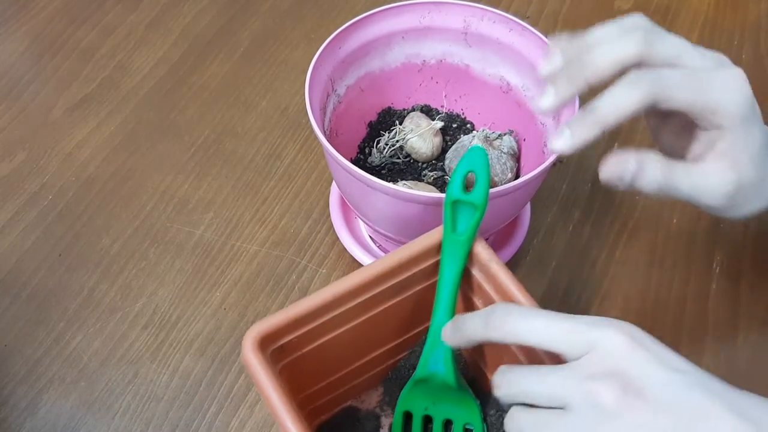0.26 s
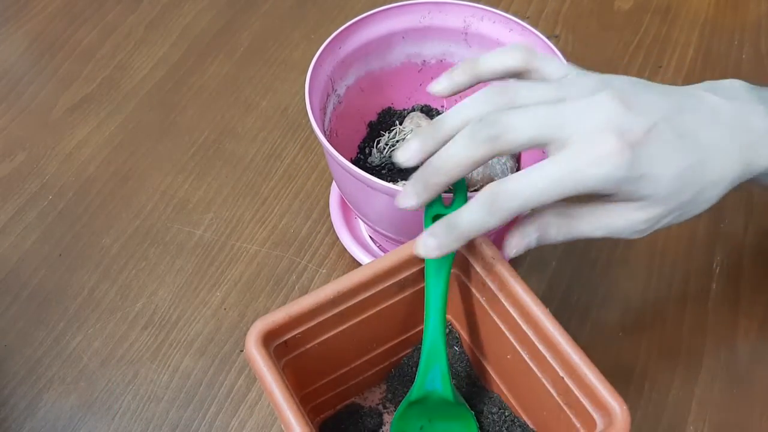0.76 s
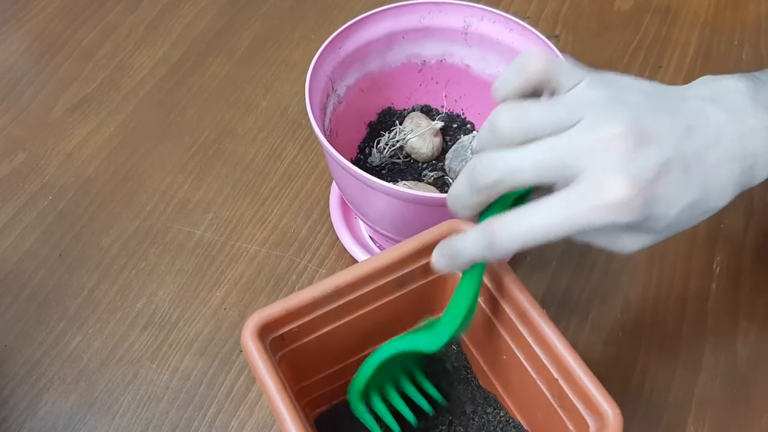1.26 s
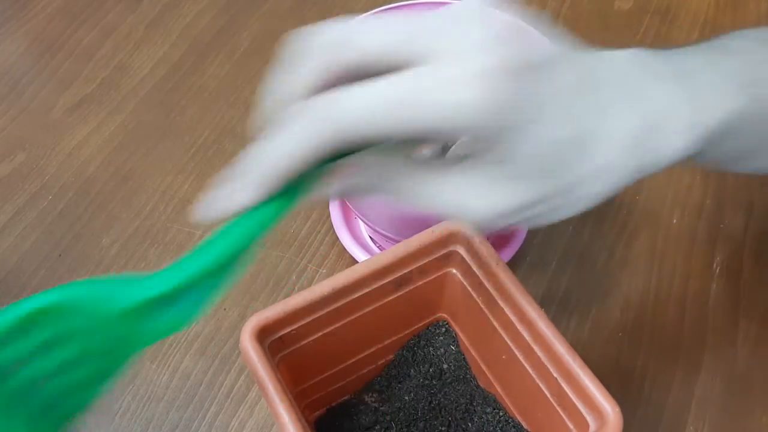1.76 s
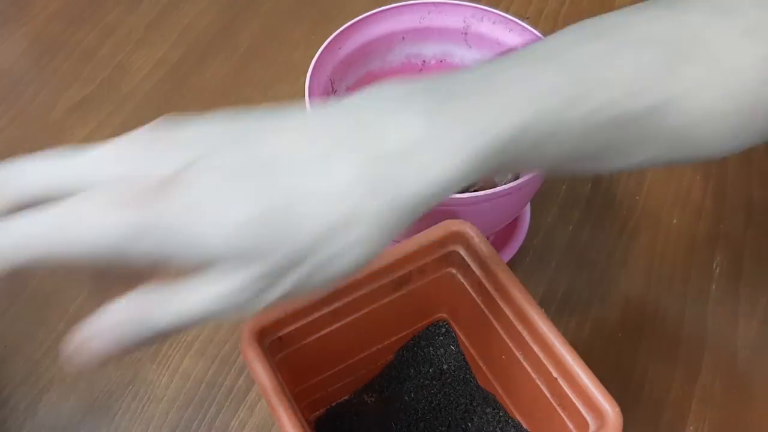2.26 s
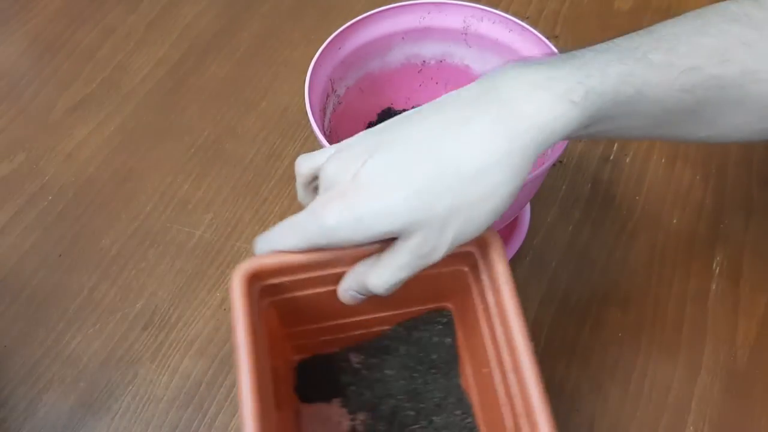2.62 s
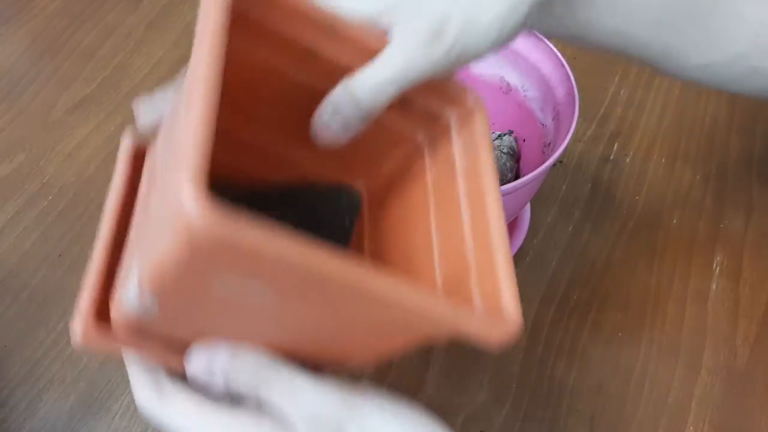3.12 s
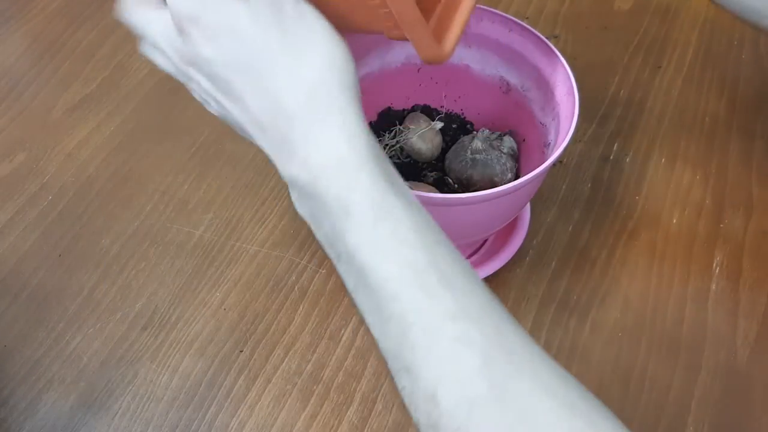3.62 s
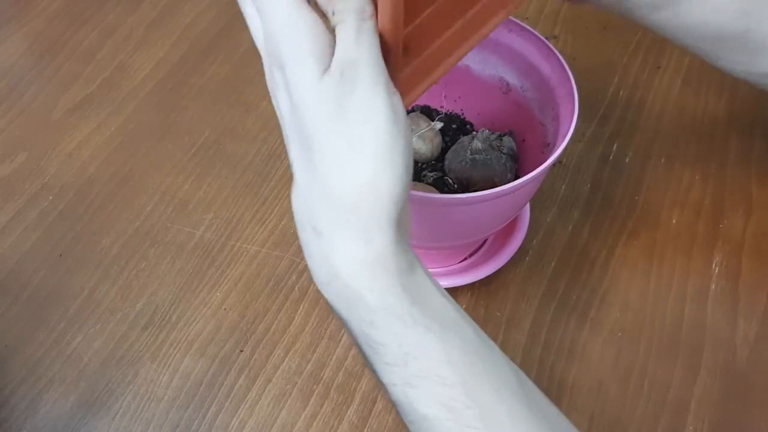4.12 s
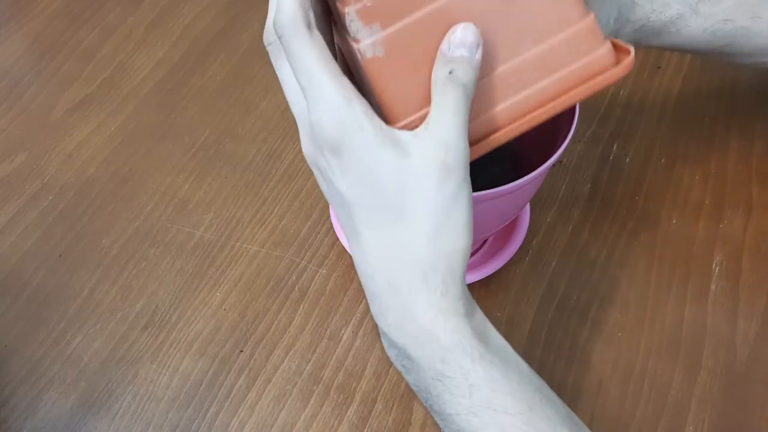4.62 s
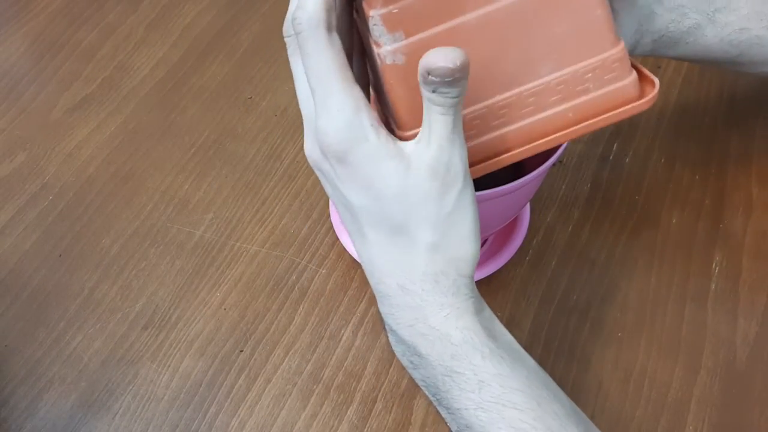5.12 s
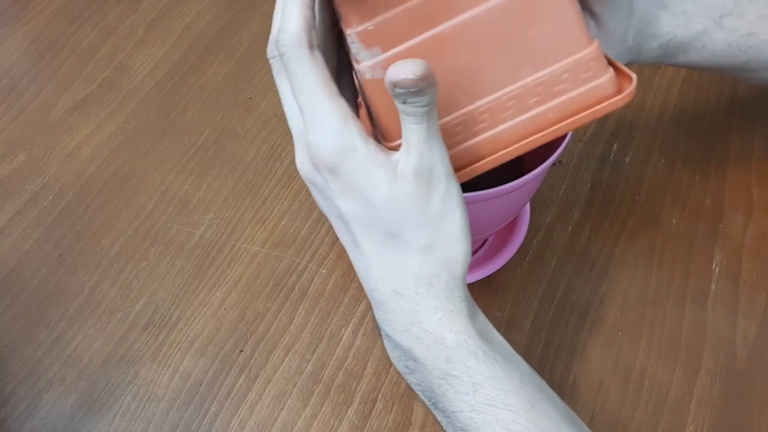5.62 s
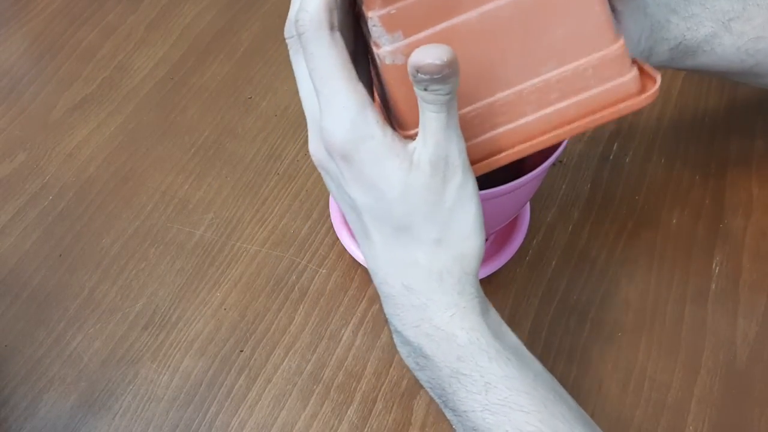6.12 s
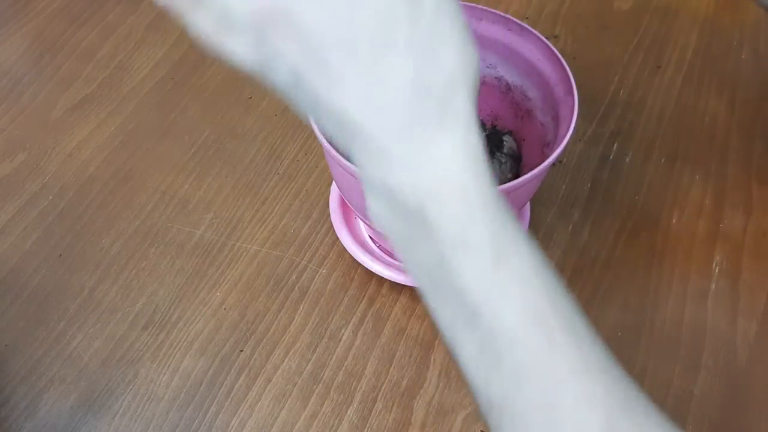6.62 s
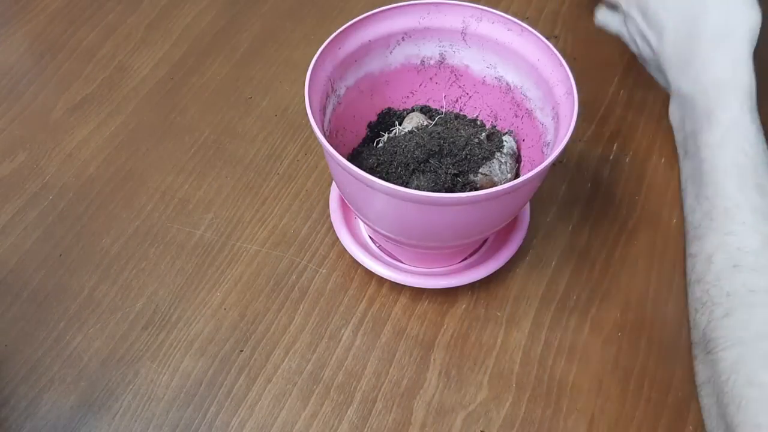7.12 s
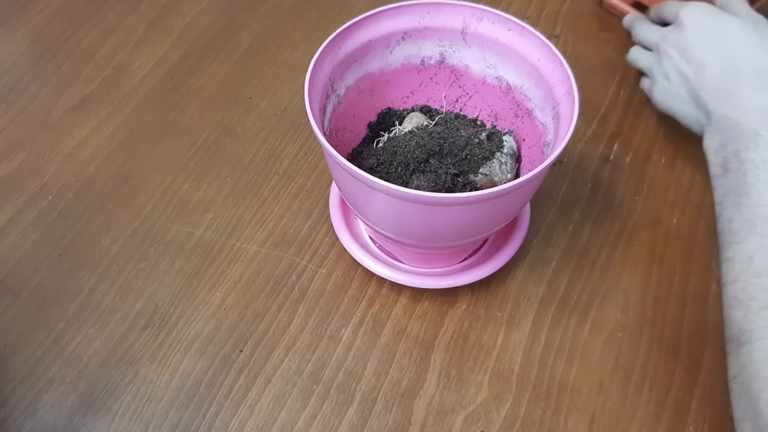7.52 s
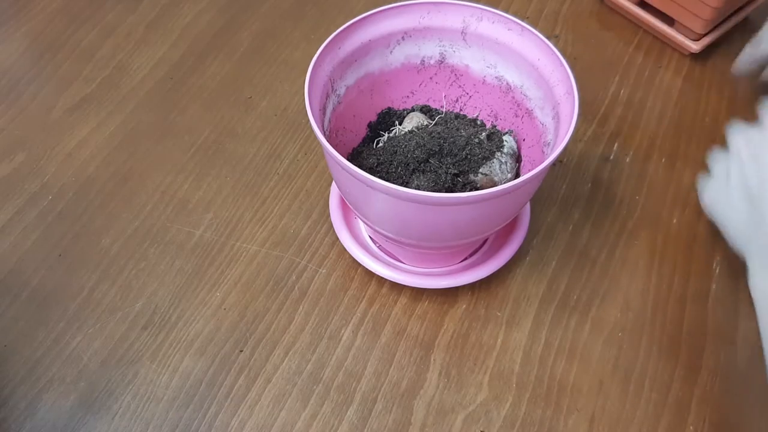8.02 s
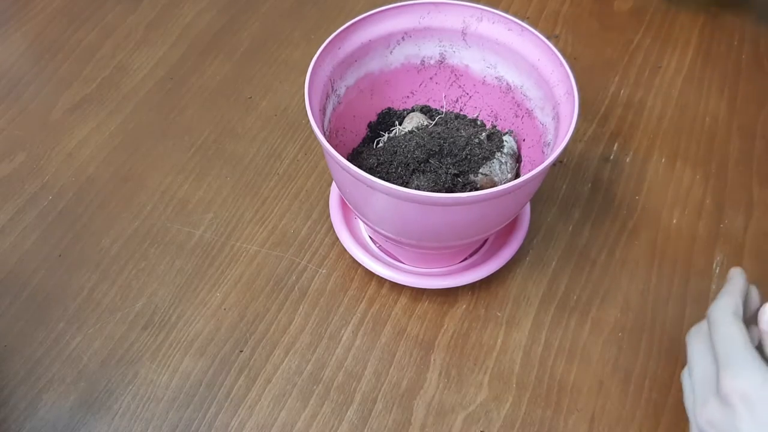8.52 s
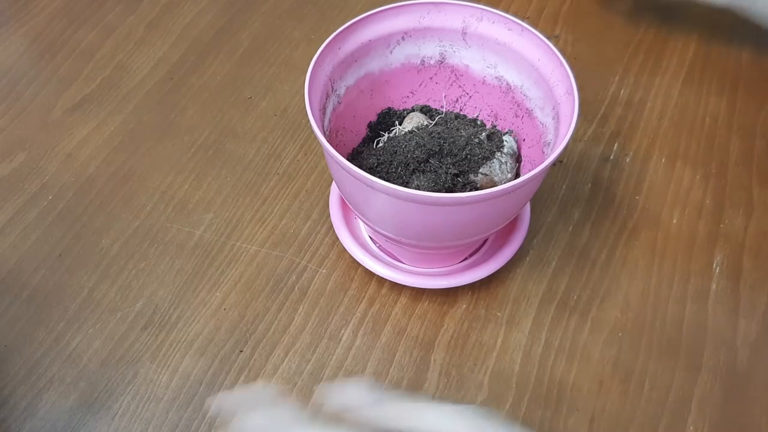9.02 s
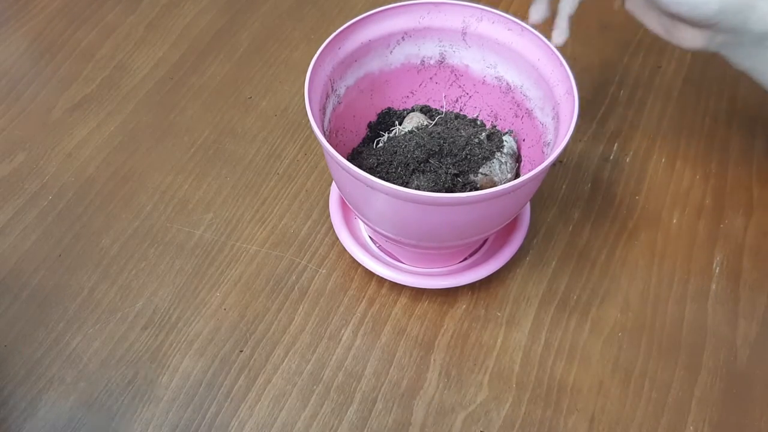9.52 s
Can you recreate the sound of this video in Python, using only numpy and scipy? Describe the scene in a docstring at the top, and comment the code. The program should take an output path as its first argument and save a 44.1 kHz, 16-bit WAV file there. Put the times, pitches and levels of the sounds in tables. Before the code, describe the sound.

Hollow plastic planter slides and knocks on a wooden table, a trowel clacks down, soil trickles softly into a pot, then more plastic knocks and scraping.

```python
"""Tipping soil into a flower pot

Soil is tipped from a plastic planter into a pot on a wooden table in a small room. A planter is slid up,
a plastic trowel is laid down, hands rub, brush and knock the thin walls, and planters are pushed and slid.
Knocks and clods are noisy touches plus ringing modes; sliding, rubbing, running soil and brushing hands
are filtered streams of tiny random contacts. Echoes and a low room tone surround them.
"""
import sys
import numpy as np
from scipy import signal
from scipy.fft import rfft, irfft, next_fast_len
from scipy.io import wavfile
from scipy.ndimage import uniform_filter1d, map_coordinates

SR = 44100
rng = np.random.default_rng(int(sys.argv[2]) if len(sys.argv) > 2 else 0)


def bounce(signal):
    """Save signal as a 16-bit WAV file at the path given by the first command-line argument."""
    frames = np.transpose(np.atleast_2d(signal))
    limited = np.clip(frames, -1, 1)
    pcm = np.round(limited * 32767).astype(np.int16)
    wavfile.write(sys.argv[1], SR, pcm)


N = 430416


def from_db(db):
    """Turn decibels into a gain."""
    return 10 ** (np.asarray(db) / 20)


def rms_one(x):
    """Scale to rms 1."""
    return x / np.sqrt(np.mean(x ** 2) + 1e-20)


def unit(x):
    """Scale to energy 1."""
    return x / np.linalg.norm(x)


def add(track, s, sound):
    """Mix a sound in at a time in seconds; a part before the start is cut off."""
    start = int(s * SR)
    sound, start = sound[max(-start, 0):], max(start, 0)
    track[start:start + len(sound)] += sound[:N - start]


def at_hz(points, hz, axis=1):
    """Read a column of a table on a log-frequency axis."""
    table = np.array(points)
    return np.interp(np.log(np.maximum(hz, 1)), np.log(table[:, 0]), table[:, axis])


def in_time(rows, axis=1):
    """Read a column at every sample, with straight lines between the rows."""
    table = np.array(rows)
    return np.interp(np.arange(N) / SR, table[:, 0], table[:, axis])


def held(rows, axis):
    """Keep each row's value until the next row starts, with smoothed steps."""
    table = np.array(rows)
    current = np.maximum(np.searchsorted(table[:, 0], np.arange(N) / SR) - 1, 0)
    return uniform_filter1d(table[current, axis], size=2000)


def swell(rise_s, hold_s, fall_s):
    """Envelope of one movement: it speeds up, holds and slows down smoothly."""
    corners = np.cumsum(np.maximum([0, rise_s, hold_s, fall_s], 0))
    ramp = np.interp(np.arange(int(corners[-1] * SR)) / SR, corners, [0, 1, 1, 0])
    return np.sin(np.pi / 2 * ramp) ** 2


def strokes(rows, rise, fall, axis=2):
    """Gain of separate strokes of one shape, each with its own length and level."""
    gain = np.zeros(N)
    for row in rows:
        s, length = row[:2]
        shape = swell(rise * length, (1 - rise - fall) * length, fall * length)
        add(gain, s, from_db(row[axis]) * shape)
    return gain


def drift(rate):
    """Slow random wander: normal random points, rate per second, joined by straight lines."""
    knots = rng.standard_normal(int(N / SR * rate) + 2)
    return np.interp(np.arange(N) / SR * rate, np.arange(len(knots)), knots)


def dying(t, t60):
    """Decay by 60 dB in t60 seconds."""
    return np.exp(-np.log(1000) * t / t60)


def band(x, low, high):
    """Keep only the sound between two frequencies."""
    return signal.sosfilt(signal.butter(3, [low, high], "band", fs=SR, output="sos"), x)


def colour(x, spectrum):
    """Filter to a spectrum, falling 20 dB per octave beyond its ends, without sounding early."""
    size = next_fast_len(x.shape[-1] + 4096, True)
    hz = np.maximum(np.fft.rfftfreq(size, 1 / SR), 1)
    octaves_outside = np.abs(np.log2(hz / np.clip(hz, spectrum[0][0], spectrum[-1][0])))
    gain = from_db(at_hz(spectrum, hz) - 20 * octaves_outside)
    # folding the cepstrum onto positive times makes the filter minimum-phase
    cepstrum = irfft(np.log(gain), size)
    cepstrum[1:size // 2] *= 2
    cepstrum[size // 2 + 1:] = 0
    return irfft(rfft(x, size) * np.exp(rfft(cepstrum)), size)[..., :x.shape[-1]]


def resonance(x, hz, q):
    """A resonance that glides: a row of band-passes, each faded in as the pitch comes near."""
    out = 0
    for centre in np.geomspace(500, 2800, 16):
        near = np.maximum(1 - np.abs(np.log2(hz / centre)) * 6, 0)
        out = out + near * rms_one(signal.lfilter(*signal.iirpeak(centre, q, fs=SR), x))
    return rms_one(out)


def grains(per_s, spread_db):
    """Random tiny contacts, a few much stronger than the rest."""
    sizes = from_db(spread_db * np.minimum(rng.exponential(1, N), 5)) * rng.choice([-1, 1], N)
    return rms_one(sizes * (rng.random(N) < per_s / SR))


def ringing(modes, t, spread_db, detune):
    """Modes struck at a random spot; the grip shifts their pitch a little."""
    hz, db, t60 = np.array(modes).T[:, :, None]
    strength, shift, sign = rng.standard_normal((3, len(modes), 1))
    gain = np.sign(sign) * from_db(db + spread_db * strength)
    tones = np.sin(2 * np.pi * hz * (1 + detune * shift) * t)
    return np.sum(gain * tones * dying(t, t60), axis=0)


def pair(mid, side, alike):
    """Left and right with a given correlation."""
    return np.sqrt((1 + alike) / 2) * mid + np.sqrt((1 - alike) / 2) * side * np.array([[1], [-1]])


# How alike left and right are. Each row: frequency in Hz, correlation (1 is identical).
LIKENESS = [(50, 0.99), (200, 0.89), (500, 0.9), (1200, 0.032), (10000, 0.07)]
# Colour of the room tone. Each row: frequency in Hz, density in dB per Hz before the loudness is set.
ROOM_TONE = [(20, -39), (32, -34), (50, -10.5), (75, -18), (120, -9), (150, -10), (210, -6.5), (360, -24.5),
             (540, -20.5), (1150, -40.5), (1800, -35), (3100, -49.5), (9000, -55), (16000, -39)]


def room_tone():
    """Low, steady murmur of the building: filtered noise that is most alike on both sides in the bass."""
    size = next_fast_len(N, True)
    alike = np.clip(at_hz(LIKENESS, np.fft.rfftfreq(size, 1 / SR)), 0, 1)
    mid, side = rfft(rng.standard_normal((2, size)))
    air = colour(irfft(pair(mid, side, alike), size)[:, :N], ROOM_TONE)
    balance = from_db(np.array([[1], [-1]]) * 0.62)   # left a little louder
    return from_db(-59) * rms_one(air) * balance


# How the room echoes. Each row: frequency in Hz, time to die by 60 dB in seconds, echo level in dB.
ROOM = [(100, 0.54, -10.5), (305, 0.37, 0.5), (800, 0.29, 1.5), (2000, 0.28, 0), (5000, 0.29, -0.5),
        (9000, 0.17, 3), (15000, .22, -1.5)]


def room(x, build_s, early_db, early_t60):
    """Early echoes off the table and walls, then a diffuse tail; the bass is alike on both sides."""
    t, response = np.arange(SR // 2) / SR, 0
    edges = np.geomspace(50, 17000, 13)
    for low, high in zip(edges, edges[1:]):
        hz = np.sqrt(low * high)
        alike = np.clip(at_hz(LIKENESS, hz), 0, 1)
        mid, side = band(rng.standard_normal((2, len(t))), low, high)
        decay = dying(t, at_hz(ROOM, hz)) + from_db(early_db) * dying(t, early_t60)
        shape = decay * (1 - np.exp(-t / build_s))
        level = from_db(at_hz(ROOM, hz, axis=2))
        response = response + level * unit(shape) * pair(mid, side, alike)
    return signal.fftconvolve(x[None], response, axes=1)[:, :N]


def shifting(first, second, turns_per_s):
    """Pass back and forth between two sound paths at even power, as the hands move."""
    angle = 2 * np.pi * turns_per_s * np.arange(N) / SR + drift(3)
    return np.cos(angle) * first + np.sin(angle) * second


# Where the hands are working. Each row: time in seconds, lead of the left microphone in ms.
PLACE = [(0, 0.074), (1.4, 0.043), (2.1, 0.53), (2.35, 0.36), (2.5, 0.04), (3, .18), (4.4, 0.0047),
         (5.5, -.2), (6.8, -0.0034), (7.3, -0.403), (7.6, -0.34), (8.3, -0.106), (8.9, -0.11), (9.5, 0.28)]
PAN_DB, PAN_DB_PER_MS = 3.5, 8.5   # left-right level difference at no lead, and its growth with the lead


def placed(x):
    """A microphone nearer to the hands hears them louder and sooner."""
    lead_ms = in_time(PLACE)
    pan_db = PAN_DB + PAN_DB_PER_MS * lead_ms
    lead = lead_ms * SR / 1000   # in samples
    n = np.arange(N)
    return np.array([from_db(side * pan_db / 2) * map_coordinates(x, [n + side * lead / 2], order=3)
                     for side in (1, -1)])


# How the planter and the table under it ring.
# Each row: pitch in Hz and level in dB (both before random shifts), time to die by 60 dB in seconds.
PLANTER_MODES = [(68.85, -10, .22), (113.8, -1, 0.4), (222, 1.5, 0.081), (285, 5, 0.15), (360.5, -1, 0.15),
                 (581.3, -1, .1), (638.6, -0.5, 0.13), (790, -8, 0.33), (941.6, -2, 0.11), (1260, -15, .11),
                 (1500, 1.5, 0.25), (1841, -11, 0.012), (2030, -1.5, 0.28), (2340, -4, 0.15),
                 (2710, -1, 0.1005), (3500, -9, 0.047), (3780, -14, 0.11), (4000, -7, 0.05),
                 (5835, -25, .08)]


def through_planter(slips, modes_db):
    """Friction is heard directly and through the ringing walls."""
    t = np.arange(SR // 4) / SR
    walls = unit(ringing(PLANTER_MODES, t, spread_db=4.5, detune=0.01458))
    return slips + from_db(modes_db) * signal.fftconvolve(slips, walls)[:N]


# A planter is pushed over the table. Each row: start in seconds, speeding up in seconds, holding in seconds,
# slowing down in seconds, level in dB before the mix, swell while holding in dB per second (of speed),
# rasp in dB before the mix, grating pitch in Hz at speed 1, grating in dB compared with the friction.
SLIDES = [(-.05, 0.021, .17, .25, -36.5, 0.5, -9, 940, -4.5),
          (8.185, 0.1, 0.19, 0.5, -33, -11.5, -14, 942, -2),
          (9.461, 0.089, .24, .05, -44.5, 48, -6.5, 1256, 10.5)]


def slide_speed():
    """Speed of the planter on the table, 1 as each push gets under way."""
    speed = np.zeros(N)
    for s, rise_s, hold_s, fall_s, _, db_per_s, *_ in SLIDES:
        push = swell(rise_s, hold_s, fall_s)
        held_s = np.clip(np.arange(len(push)) / SR - rise_s, 0, hold_s)
        add(speed, s, push * from_db(db_per_s * held_s))
    return speed


# Colours of the sliding sounds. Each row: frequency in Hz, density in dB per Hz before the loudness is set.
FRICTION, RUMBLE, RASP = [(200, -35), (300, 0), (430, -6), (680, 4), (1000, -4.5), (1350, 3), (1900, -5.5),
                          (2500, -4.5), (3400, -9.5)], [(40, -11), (80, -15.5), (120, 6.5), (160, -11.5), (220, -2),
                                            (290, -9), (420, -23.5)], [(1300, -25), (2200, -3), (2700, -1),
                                                            (3400, -5.5), (4200, 1.5), (5200, -4),
                                                            (7500, -16), (8800, -35.5), (11500, -12),
                                                            (14000, -15), (16000, -13)]
RUMBLE_POWER, RASP_POWER = 0.44, 1.0   # loudness grows as these powers of the speed
GRATE_RISE = 0.123                     # octaves the grating rises when the speed doubles


def slides(friction_db, rumble_db, rasp_db, judder_db):
    """The gritty base catches and slips on the wood, and the table top rumbles; speed drives level and pitch."""
    judder = from_db(judder_db * drift(70))
    speed = slide_speed()
    level = from_db(held(SLIDES, axis=4))
    hz = held(SLIDES, axis=7) * np.maximum(speed, .1) ** GRATE_RISE
    slips = through_planter(grains(5000, 2.55), modes_db=-25)
    grate = from_db(held(SLIDES, axis=8)) * resonance(grains(5000, 5.2), hz, q=8.0)
    friction = from_db(friction_db) * speed * (rms_one(colour(slips, FRICTION)) + grate)
    rumble = from_db(rumble_db) * speed ** RUMBLE_POWER * rms_one(colour(slips, RUMBLE))
    rasp_gain = from_db(rasp_db + held(SLIDES, axis=6)) * speed ** RASP_POWER
    rasp = rasp_gain * rms_one(colour(grains(9000, 2.1), RASP))
    return judder * level * (friction + rumble + rasp)


# Fingers rub on plastic. Each row: start in seconds, length in seconds, level in dB before the mix,
# squeak pitch in Hz before it wanders.
RUBS = [(.565, 0.097, -50, 743), (.68, .07, -55, 2000), (.87, 0.16, -51, 856), (1.14, 0.074, -58, 899),
        (1.69, 0.1, -64, 2000), (2.435, .075, -33, 850), (2.51, 0.17, -50, 1196), (2.655, 0.14, -38.5, 743),
        (2.77, 0.14, -36.5, 763), (2.93, .065, -41.5, 620), (3.03, 0.13, -42.5, 760),
        (3.78, 0.086, -52, 1138), (4.22, 0.099, -72, 1882), (6.26, .2, -65, 1400), (6.66, 0.13, -47, 852),
        (6.73, 0.11, -55, 1378), (6.87, 0.062, -45, 826), (7.06, 0.069, -53, 1180), (7.3, .065, -38, 1620),
        (7.37, 0.068, -42, 800), (7.445, 0.056, -37, 1000)]
# Colour of the scrape. Each row: frequency in Hz, density in dB per Hz before the loudness is set.
SCRAPE = [(140, -28), (250, -13), (450, -16), (700, 6), (1100, -11), (1600, -10), (2400, -11.5),
          (4000, -23.5), (7000, -21), (9000, -47.5)]
RUB_RISE, RUB_FALL = .35, 0.43   # shares of its length in which a rub swells and fades


def rubs(level_db, judder_db, squeak_db, overtone_db, firm_db):
    """Skin sticks and slips unevenly on the walls; only a firm rub breaks into a hoarse squeak."""
    slips, effort = grains(2000, 2.5), strokes(RUBS, RUB_RISE, RUB_FALL)
    hz = held(RUBS, axis=3) * 2 ** (.12 * drift(25))   # the grip keeps shifting
    overtone = from_db(overtone_db) * resonance(slips, 2.0 * hz, q=6.3)
    squeak = resonance(slips, hz, q=7.8) + overtone
    scrape = rms_one(colour(through_planter(slips, modes_db=-5.0), SCRAPE))
    firmness = effort / (effort + from_db(firm_db))
    sound = scrape + firmness * from_db(squeak_db) * band(squeak, 432, 2400)
    # even out the loudness, so that effort and judder alone set it
    steady = sound / np.sqrt(uniform_filter1d(sound ** 2, size=1300) + 1e-9)
    return from_db(level_db + judder_db * drift(70)) * effort * steady


def contact(t, scuff_ms, chatter):
    """First touch, then a burst of tiny slips that swells and dies; a long scuff starts softly."""
    age = t / (scuff_ms / 1000)
    slips = rng.standard_normal(len(t)) * np.sqrt(age) * np.exp(-1.5 * age)
    return (t == 0) / scuff_ms + chatter * unit(slips)


# The thump, body, clack and tick ranges of a blow. Each row: lowest Hz, highest Hz.
RANGES = [(45, 450), (450, 1800), (1800, 6000), (6000, 15000)]
TICK_GROWTH = 1.48   # dB of tick per dB of hardness


def weigh(blow, level_db, thump_db, hardness_db, tick_db):
    """Set a blow's strength over its first 30 ms: weight adds thump, hardness adds clack and still more tick."""
    head = int(.03 * SR)
    re_level_db = np.array([thump_db, 0, hardness_db, tick_db + TICK_GROWTH * hardness_db])
    parts = [band(blow, low, high) for low, high in RANGES]
    return sum(from_db(level_db + db) * part / np.std(part[:head]) for db, part in zip(re_level_db, parts))


def wavering(t, hz, width_hz):
    """A flexed wall does not hold its pitch: its phase wanders."""
    wander = np.cumsum(rng.standard_normal(len(t))) * np.sqrt(width_hz / SR)
    return np.sin(2 * np.pi * hz * t + uniform_filter1d(wander, size=40))


def in_air(blow, cut_hz):
    """Off the table, the light walls cannot radiate any bass."""
    return signal.sosfilt(signal.butter(4, cut_hz, "high", fs=SR, output="sos"), blow)


# Knocks on the planter, and the trowel touching down, dropping and tipping over.
# Each row: time in seconds, level in dB before the mix, thump in dB compared with the level, hardness in dB,
# pitch of the flexing wall in Hz, its share in dB, time scale of the scuff in ms.
KNOCKS, TROWEL = [(.712, -55.5, -2.5, 0, 2000, 5, 9), (.947, -49, 6.5, -21, 615, 10.5, 3.6),
                  (.984, -50, -9, -8, 1610, 8, 5.6), (1.177, -45, -20, -18.5, 897, 11, 3),
                  (1.4287, -34, -6.5, -11, 990, 0, 1.04), (2.222, -36, -2, -19, 1680, 0, 10),
                  (2.467, -30.5, -4, -5, 1560, 0, 1.8), (2.6934, -37, -10.5, -12.5, 705, 10, 2.1),
                  (2.71, -43.5, -9.5, -2, 1620, -10, 3.1), (2.7695, -36, -15.5, -9, 1640, -6, .8),
                  (2.9109, -35, -9, -27, 680, 11, 0.88), (2.985, -16.5, -14, -3.5, 1225, -0.5, .7),
                  (2.995, -31.5, -16, -3, 1248, 7, 1.7), (3.285, -42, -1, -8.5, 702, 5.5, 1.7),
                  (3.3552, -23, -9.5, -2, 402.5, -2.5, 1.6), (3.7327, -38, -2, -4, 675, 0.5, 3.8),
                  (6.7879, -35, -10.5, -4.5, 1265, -8, 1.53), (6.8331, -26, -16.5, -14, 692, -1, 10),
                  (6.851, -31, -8.5, -5, 930, -2, 3.5), (6.9462, -42, -8, -23, 800, 3.5, 1.53),
                  (7.0971, -49, -5.5, -23.5, 1270, 8.5, 8), (7.281, -24, -17.5, -11.5, 1613, 6.5, 3.9),
                  (7.3806, -35, -3, -15, 696, 4.5, 2.5), (7.4236, -40.5, -3.5, -17, 616, 6, 3),
                  (7.4596, -37, -1.5, -10.5, 950, -5, 5.7), (7.479, -18.5, -2, -6.5, 285, -2.5, 4.4),
                  (7.5655, -20, -4, -12.5, 1500, -4, 1.04), (7.5825, -20, -4.5, -11, 887, 6.5, 3.86),
                  (8.2383, -29, -5, -10, 935, 3, 1), (9.5368, -32, -5, -17, 677, -1.5, 6)], [(2.108, -41, -1.5, -3.5, 1704, 4.5, 22),
                                  (2.162, -23.5, -9, 1, 2725, -3, 3.5),
                                  (2.3325, -25, -10, -9, 790, -2.5, 2.5)]
# Colour of a contact on thin plastic. Each row: frequency in Hz, gain in dB.
CRACK = [(70, -15.5), (250, 1.5), (450, -7.5), (900, 2.5), (1800, -2.5), (4300, -5.5), (6000, -13.5),
         (9000, -20), (12000, -15.5), (16000, -22)]
# The planter is held in the air: from and until, in seconds.
LIFTED = (2.95, 7.45)
KNOCK_TICK_DB, TROWEL_TICK_DB = -19, -7       # tick of a blow of hardness 0, compared with its level
WALL_T60_S, LIFTED_WALL_T60_S = .05, 0.088    # ring of a flexed wall on the table, and held in the air
GRIP_T60_S = .25                              # the hands damp the modes further while they hold the planter


def knocks(rows, tick_db, modes_db, shell_t60, shell_db, shell_cut_hz):
    """A contact cracks, shakes the many short modes of the shell, and rings the main ones and the struck wall."""
    out, t = np.zeros(N), np.arange(SR // 3) / SR
    for s, level, thump, hardness, wall_hz, wall_db, scuff_ms in rows:
        force = contact(t, scuff_ms, chatter=1.4)
        shell = rng.standard_normal(len(t)) * dying(t, shell_t60)
        shell = unit(signal.lfilter(*signal.butter(1, shell_cut_hz, fs=SR), shell))
        crack = unit(colour(unit(force) + from_db(shell_db) * shell, CRACK))
        build_up = 1 - np.exp(-t / (scuff_ms / 2000))   # a longer scuff sets off the ringing more slowly
        modes = from_db(modes_db) * unit(ringing(PLANTER_MODES, t, spread_db=0.5, detune=0.0048))
        lifted = LIFTED[0] < s < LIFTED[1]
        if lifted:
            modes = modes * dying(t, GRIP_T60_S)
        wall_t60 = LIFTED_WALL_T60_S if lifted else WALL_T60_S
        wall = from_db(wall_db) * unit(wavering(t, wall_hz, width_hz=270) * dying(t, wall_t60))
        blow = crack + build_up * (modes + wall)
        if lifted:
            blow = in_air(blow, cut_hz=180)
        add(out, s, weigh(blow, level, thump, hardness, tick_db))
    return out


# Clods and grit landing in the pot or jumping in the planter. Each row: time in seconds,
# level in dB before the mix, thump in dB compared with the level, hardness in dB, time scale of crumbling in ms.
CLODS = [(2.534, -47, 5.5, 5, 3), (2.8926, -53.5, -4, 8.5, 2.3), (3.733, -46, -1.5, 2.5, 8),
         (4.404, -48, 11.5, -0.5, 14), (4.641, -49.5, 1, -4, 4.1), (4.7, -68.5, 1.5, 2.5, 2.9),
         (5.283, -71, 15, -2.5, 10.3), (5.4916, -50.5, 11, -2.5, 3.5), (5.521, -61.5, 4.5, 5, .9),
         (5.551, -64.5, 10, -8, 10), (7.1, -62.5, -11, -2, 3), (7.582, -44.5, 0, 5, 8.2),
         (8.197, -62.5, -5.5, -1, 3), (9.405, -74.5, -2, 3, 1.8)]
# How the flower pot on the table rings.
# Each row: pitch in Hz and level in dB (both before random shifts), time to die by 60 dB in seconds.
POT_MODES = [(121, -7.5, 0.43), (272.5, 4, 0.089), (357.6, -4.5, 0.1714), (476, -2, 0.0878),
             (680, 0.5, 0.14), (2657, -11.5, 0.12)]
CLOD_TICK_DB = -11   # tick of a clod of hardness 0, compared with its level


def clods(modes_db, thud_growth):
    """Soft lumps thud down and crumble; the heavier the lump, the more the pot rings."""
    out, t = np.zeros(N), np.arange(SR // 3) / SR
    for s, level, thump, hardness, crumble_ms in CLODS:
        crumbs = unit(colour(contact(t, crumble_ms, chatter=2.2), CRACK))
        pot = unit(ringing(POT_MODES, t, spread_db=4.0, detune=0.023))
        thud = from_db(modes_db + thud_growth * thump) * pot
        add(out, s, weigh(crumbs + thud, level, thump, hardness, CLOD_TICK_DB))
    return out


TAIL_DB, TAIL_S = -15.5, 0.11   # level of the tail, and the time in which it falls to 37 %


def with_tail(gain):
    """Each run drags a thin, dying tail after it."""
    keep = np.exp(-1 / (TAIL_S * SR))
    return gain + from_db(TAIL_DB) * signal.lfilter([1 - keep], [1, -keep], gain + 1e-18)


# Runs of dry hiss and rustle: loose soil running over plastic, and hands brushing it.
# Each row: start in seconds, length in seconds, hiss in dB before the mix, rustle in dB before the mix.
RUNS = [(.66, 0.32, -77, -72.5), (.83, 0.31, -73.5, -65.5), (1.05, 0.51, -83, -78.5),
        (1.7, 0.48, -90.5, -97), (2.18, 0.21, -66, -59), (2.43, 0.15, -54.5, -46), (2.53, 0.18, -60.5, -58),
        (2.68, 0.39, -66, -58), (3.02, 0.16, -56.5, -50), (3.16, 0.22, -62, -59), (3.52, 0.17, -71, -70),
        (3.68, 0.16, -65, -59), (3.785, 0.12, -54.5, -52), (3.88, 0.62, -74.5, -74),
        (4.19, 0.22, -75.5, -66), (4.36, 0.28, -69.5, -65.5), (4.56, 0.3, -70.5, -69),
        (4.75, 0.24, -89, -79.5), (5.22, .12, -80, -69.5), (5.32, 0.2, -90.5, -79.5),
        (6.23, 0.32, -67.5, -64.5), (6.52, 0.26, -80, -76), (6.665, 0.18, -62, -60),
        (6.88, 0.22, -77.5, -76.5), (7.05, 0.14, -70.5, -64.5), (7.28, 0.44, -68, -55),
        (7.92, .17, -85.5, -89), (8.67, 0.23, -56.5, -64), (9.25, 0.15, -70, -70.5)]
# Colours of the hiss and the rustle.
# Each row: frequency in Hz, density in dB per Hz before the loudness is set.
HISS, RUSTLE = [(2000, -13), (4000, 2.5), (7000, -3.5), (9000, -14), (12000, -3), (15500, -7)], [(600, -10), (900, -3), (1600, -2), (2600, -2.5), (4000, -17.5), (6000, -29)]
RUN_RISE, RUN_FALL = 0.27, 0.58   # shares of its length in which a run swells and fades


def soil_and_brushing(hiss_db, rustle_db, ticks_db, rustle_per_s):
    """Dense tiny contacts hiss in small surges, with ticks among them; sparser ones rustle."""
    surge = from_db(1.5 * drift(30))
    hiss_gain = with_tail(strokes(RUNS, RUN_RISE, RUN_FALL, axis=2))
    rustle_gain = with_tail(strokes(RUNS, RUN_RISE, RUN_FALL, axis=3))
    ticks = from_db(ticks_db) * grains(299.6, 2.993)
    hiss = from_db(hiss_db) * hiss_gain * rms_one(colour(grains(16000, 1.4) + ticks, HISS))
    rustle = from_db(rustle_db) * rustle_gain * rms_one(colour(grains(rustle_per_s, 3.0), RUSTLE))
    return (hiss + rustle) * surge


def scene():
    """All the handling on the table, in the room."""
    sliding = slides(friction_db=-8.0, rumble_db=-12.5, rasp_db=-0.5, judder_db=2.0)
    fingers = rubs(level_db=-5.0, judder_db=6.5, squeak_db=2.0, overtone_db=-2, firm_db=-51.5)
    planter = from_db(-4.5) * knocks(KNOCKS, KNOCK_TICK_DB, modes_db=-4,
                                     shell_t60=0.046, shell_db=-5.5, shell_cut_hz=1300)
    trowel = from_db(-4.5) * knocks(TROWEL, TROWEL_TICK_DB, modes_db=-4,
                                    shell_t60=.09, shell_db=-8, shell_cut_hz=8000)
    lumps = from_db(-2.0) * clods(modes_db=-2.5, thud_growth=1.0)
    runs = soil_and_brushing(hiss_db=2.5, rustle_db=-1.0, ticks_db=-9, rustle_per_s=1800)
    dry = sliding + fingers + planter + trowel + lumps + runs
    echoes = [room(dry, build_s=0.0005, early_db=4.5, early_t60=0.041) for path in range(2)]
    return placed(dry) + shifting(*echoes, turns_per_s=2.3) + room_tone()


def record(dry):
    """The top is cut steeply above 15950 Hz."""
    return signal.sosfilt(signal.ellip(10, .2, 80, 15950, fs=SR, output="sos"), dry)


dry = scene()
out = record(dry)
bounce(out)
```